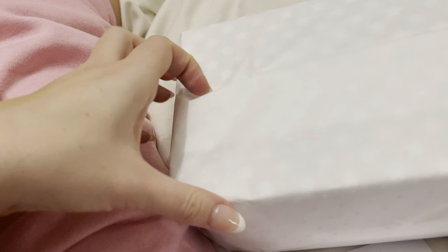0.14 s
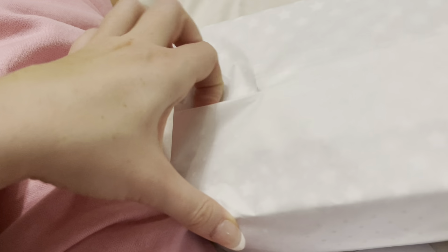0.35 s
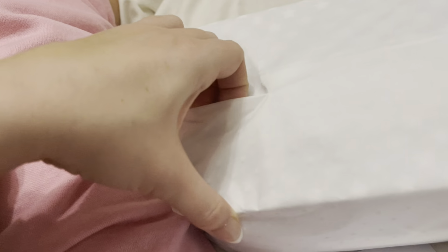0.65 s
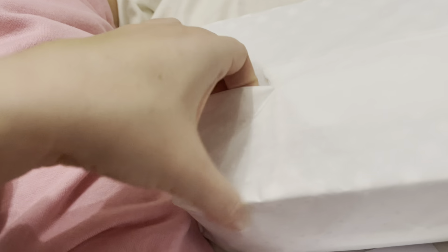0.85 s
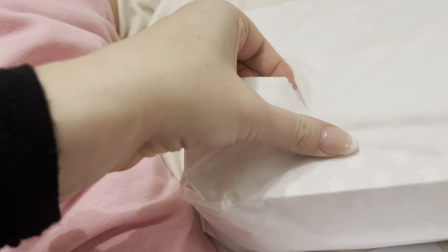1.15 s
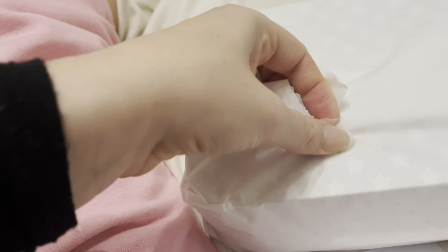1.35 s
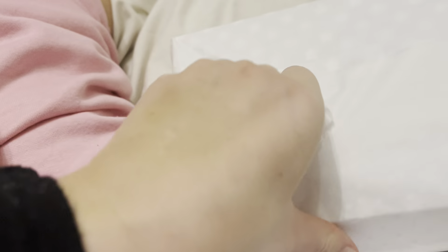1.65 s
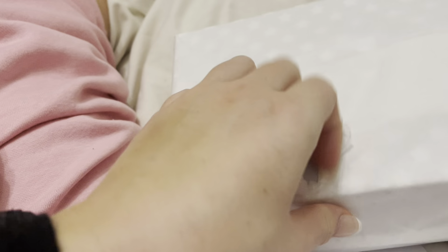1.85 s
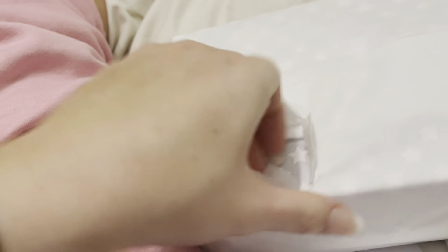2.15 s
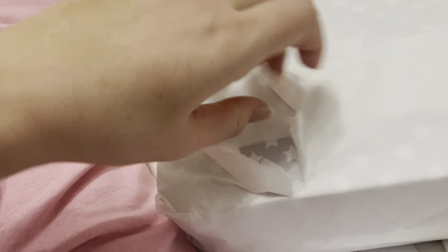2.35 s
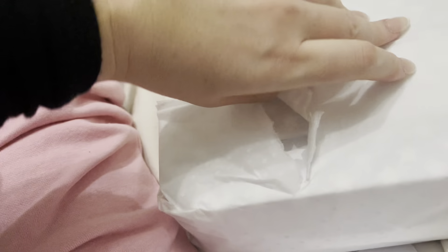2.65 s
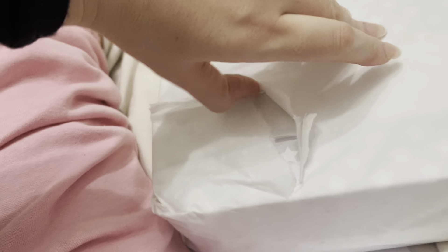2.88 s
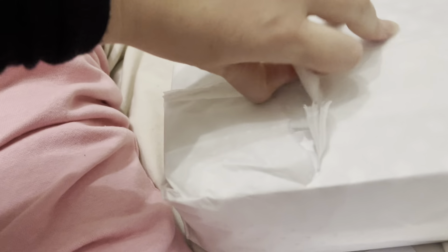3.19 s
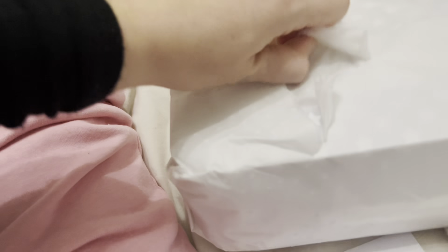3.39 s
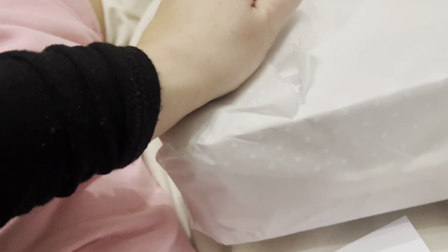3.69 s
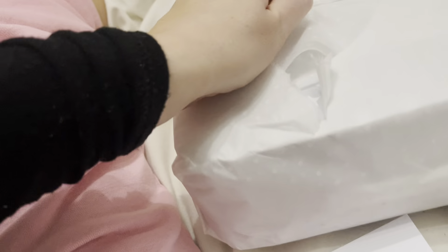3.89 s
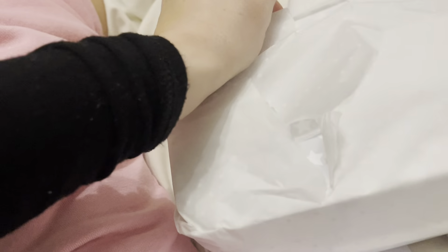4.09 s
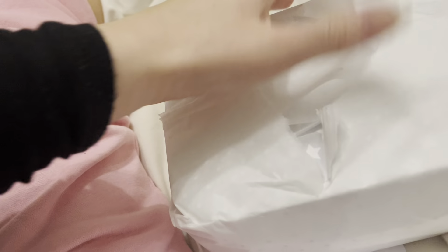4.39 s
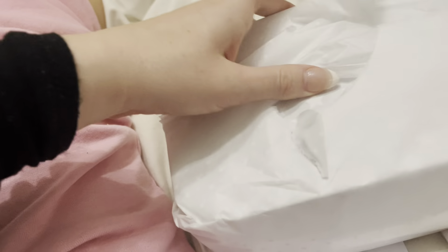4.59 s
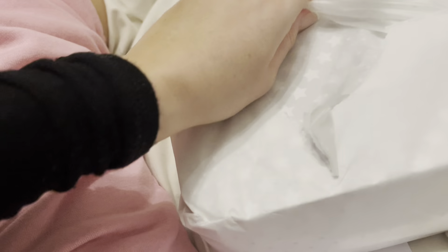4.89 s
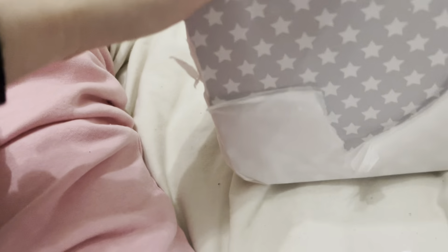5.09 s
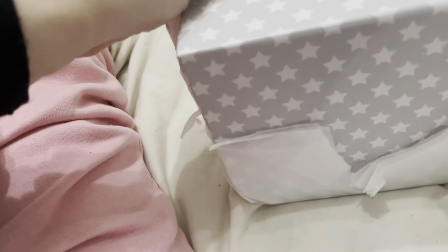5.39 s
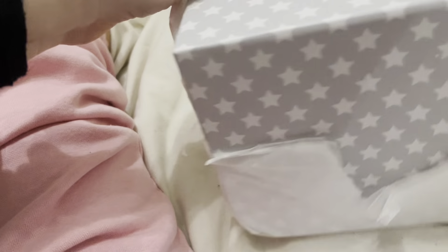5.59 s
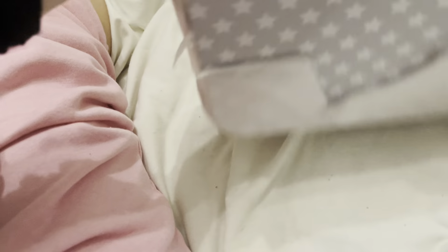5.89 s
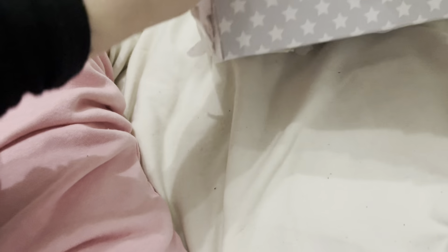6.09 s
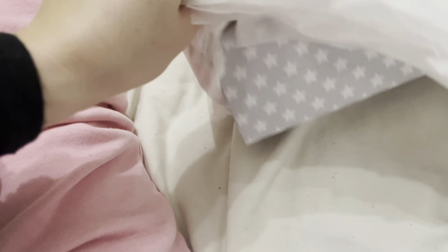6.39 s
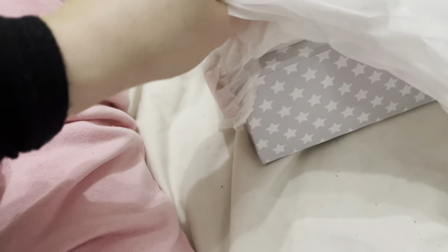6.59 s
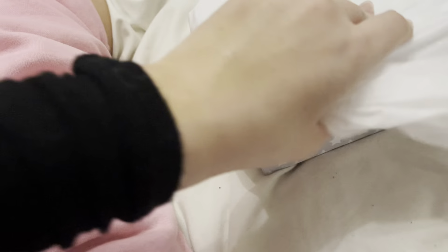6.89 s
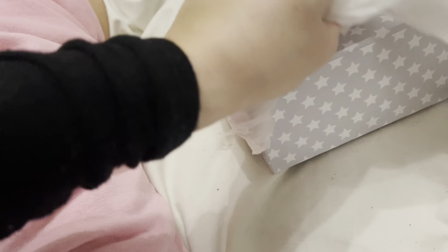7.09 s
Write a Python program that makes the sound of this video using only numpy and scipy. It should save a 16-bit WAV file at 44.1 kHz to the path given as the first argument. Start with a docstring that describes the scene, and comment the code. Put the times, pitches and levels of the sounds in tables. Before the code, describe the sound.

A hand tears tissue paper from a hollow card box resting on a bed. Light, ticking tugs come first, then a dense cluster of snapping creases and finger knocks, then smaller rustles and taps. Harder tearing returns around the middle and runs into broad crumpling and sliding to the end. Very close stereo microphone, bright and crisp, in a dry indoor space.

```python
"""A hand picks at, tears and crumples tissue paper round a hollow card box on a soft bed, from start to end.
First come light tugs; from 0.6 to 1.6 s snapping creases crowd together and fingers knock the box.
Smaller tugs and taps follow; from 3 s harder tugs return with ticks, scattered knocks and a late snap at 7 s.
Creases are dying puffs of noise in clumps, sliding is steady noise, and the box is a set of struck modes.
Two close microphone ports ring in the high treble and hear it out of step."""
import sys
import numpy as np
from scipy import signal
from scipy.fft import rfft, irfft
from scipy.io import wavfile
from scipy.ndimage import uniform_filter1d

SR = 44100
rng = np.random.default_rng(int(sys.argv[2]) if len(sys.argv) > 2 else 0)


def level_to_linear(level):
    """Convert decibel levels to linear amplitude factors, elementwise."""
    exponent = np.asarray(level, float) / 20
    return 10 ** exponent


def int16_out(signal):
    """Quantize to a 16-bit WAV file."""
    q = np.round(np.clip(np.atleast_2d(signal).T, -1, 1) * 32767)
    wavfile.write(sys.argv[1], SR, q.astype(np.int16))


N = 319725


def evened(x):
    """Scales to rms 1 of the channel mean."""
    mid = x.mean(0) if x.ndim > 1 else x
    return x / np.sqrt(np.mean(mid ** 2) + 1e-20)


def read(points, hz):
    """Reads a table on a log-frequency axis."""
    f, value = np.transpose(points)
    return np.interp(np.log(hz + 1), np.log(f + 1), value)


def curves(table):
    """Every column of a table after the time, at every sample."""
    s, *columns = np.transpose(table)
    return [np.interp(np.arange(N) / SR, s, column) for column in columns]


def add(mix, start_s, sound):
    """Mixes a sound in at its start time."""
    part = mix[..., max(round(start_s * SR), 0):][..., :sound.shape[-1]]
    part += sound[..., :part.shape[-1]]


# Likeness of the two ports. Each row: frequency in Hz, share of the left sound in the right (0 to 1).
PORT_LIKENESS = [(60, .96), (1000, .87), (3000, .55), (7000, .65), (8500, .94), (10300, .98), (13000, .85)]
# Phase between the ports. Each row: frequency in Hz, lag of the right port in radians.
PORT_LAG = [(0, 0), (1000, .25), (2500, 1.2), (3900, .3), (6800, .3), (7500, 1.3), (8700, -.3),
            (11800, -6.1), (13200, -9.1), (15000, -12.6)]
# Balance of the ports. Each row: frequency in Hz, left over right in dB.
PORT_BALANCE = [(150, 1), (500, 4), (6500, 2.5), (9800, 0)]


def ports(pair, colour_db):
    """The right port shares part of the left one's sound, shifted in phase, and hears the rest afresh."""
    hz = np.fft.rfftfreq(pair.shape[1], 1 / SR)
    left, other = rfft(pair) * level_to_linear(colour_db(hz))
    same = np.clip(read(PORT_LIKENESS, hz), 0, 1)
    lag_rad = np.interp(hz, *np.transpose(PORT_LAG))
    right = same * left * np.exp(-1j * lag_rad) + np.sqrt(1 - same ** 2) * other
    lean = level_to_linear(read(PORT_BALANCE, hz) / 2)
    return irfft([left * lean, right / lean], pair.shape[1])


# Paper through the ports, which ring near the top. Each row: frequency in Hz, level in dB.
PAPER_COLOUR = [(600, -21), (1100, -8.5), (1550, -15.5), (1900, -11), (2700, -9.5), (5000, -6.5),
                (6200, -9.5), (8000, -1.5), (9500, 2.5), (10600, 7), (11500, 1), (13000, -14.5),
                (15000, -27)]
SPLIT_HZ = 6050  # fine crumpling above, broad folds below


def paper_bands(pair):
    """Colours a pair as paper; returns its treble and its mid band."""
    def slope_db(hz):
        return 10 * np.log10(1 + (hz / SPLIT_HZ) ** 10)
    mids = ports(pair, lambda hz: read(PAPER_COLOUR, hz) - slope_db(hz))
    treble = ports(pair, lambda hz: read(PAPER_COLOUR, hz) - slope_db(SPLIT_HZ ** 2 / (hz + 1)))
    return treble, mids


TINT_DB = 4.5


def tint(size=64):
    """A short filter with a lumpy random colour of its own."""
    lumps = np.interp(np.linspace(0, 11, size // 2 + 1), np.arange(12), rng.standard_normal(12))
    return evened(np.roll(irfft(level_to_linear(TINT_DB * lumps), size), size // 2))[None]


def puffs(clicks, t60_s):
    """Each click lets out a dying puff of fresh noise; one tint colours them all."""
    shape = signal.lfilter([1], [1, -level_to_linear(-60 / (t60_s * SR))], clicks) / np.sqrt(t60_s)
    noise = shape * rng.standard_normal((2, len(clicks)))
    return signal.oaconvolve(noise, tint(), axes=1)[:, :len(clicks)]


TONE_DB, TONE_OCTAVES = 7, 1


def lift_db(hz, tone_hz):
    """A broad rise round the tone of a fold."""
    return TONE_DB * np.exp(-(np.log2((hz + 1) / tone_hz) / TONE_OCTAVES) ** 2)


def ring(modes):
    """Modes after one push; neighbours start in opposite sense, so little is left below them."""
    t = np.arange(4096) / SR
    return sum((-1) ** k * level_to_linear(db - 60 * t / t60_s) * np.sin(2 * np.pi * hz * t)
               for k, (hz, db, t60_s) in enumerate(modes))


LID_HZ, LID_T60_S = 258, .055
FLEX_HZ, FLEX_S = 1533, 0.00414  # start above the lid's pitch, time constant


def flex():
    """The card bends with a short tick that falls towards the pitch of the lid."""
    fade = np.exp(-np.arange(1024) / SR / FLEX_S)
    return fade * np.sin(2 * np.pi * np.cumsum(LID_HZ + FLEX_HZ * fade) / SR)


# Card walls and the air inside. Each row: frequency in Hz, level in dB, t60 in seconds.
BOX_MODES = [(226, 5, 0.026), (351, 6.5, 0.043), (437.5, 10.5, 0.021), (588, 8, 0.017), (1220, -1.5, 0.014)]
# Bedding gives under the box. Each row: frequency in Hz, level in dB, t60 in seconds.
BED_MODES = [(67, -8, 0.065), (115, -2.5, 0.029)]
# How the sheet is handled. Each row: time in seconds, base level of sliding against creases in dB,
# ring of the lid in dB, tone of the folds in Hz, give of the bedding in dB.
GRIP = [(0, -6, 6, 5900, -8), (.9, -7, 9.5, 4150, -8), (1.3, -3, 13.5, 2700, 10), (1.6, 0, 3.5, 2030, -19),
        (2.6, -6, 7.5, 2270, -31), (3.5, -11, 0.5, 2380, 9.5), (4.7, 2, 2.5, 2240, 7),
        (5.6, 0.5, 2.5, 1330, 14.5), (6.2, -0.5, -4, 2170, 9), (7.25, 2, 7, 1790, 12.5)]
RUB_FLEX_DB = 0


def box(pushes):
    """Walls, lid and bedding answer the pushes, lid and bedding as the grip allows; the card flexes."""
    _, lid_db, _, bed_db = curves(GRIP)
    parts = [(0, BOX_MODES), (lid_db, [(LID_HZ, 0, LID_T60_S)]), (bed_db, BED_MODES)]
    out = sum(signal.oaconvolve(pushes * level_to_linear(db), ring(modes)[None], axes=1) for db, modes in parts)
    flexing = signal.oaconvolve(pushes, flex()[None], axes=1)
    out = out[:, :N] + level_to_linear(RUB_FLEX_DB) * flexing[:, :N]
    return ports(out / np.linalg.norm(ring(BOX_MODES)), np.zeros_like)


# Fingers knock the box. Each row: start in seconds, peak of the ring ahead of the ports in dB.
KNOCKS = [(0.187, -32), (0.29, -29.5), (0.522, -32), (1.004, -22), (1.045, -26), (1.101, -21.5),
          (1.166, -23.5), (1.195, -18.5), (1.24, -25), (1.464, -29.5), (1.49, -32), (1.771, -35.5),
          (2.18, -35), (2.312, -35), (2.394, -26), (2.46, -34), (2.48, -29), (2.508, -28), (2.552, -31),
          (2.598, -34.5), (2.664, -32), (2.809, -28), (2.935, -33), (3.31, -23.5), (4.541, -23),
          (4.746, -22.5), (4.924, -28.5), (5.128, -27), (5.295, -19), (6.269, -22)]
KNOCK_SPREAD = 0.063  # pitch scatter as a fraction
KNOCK_LID_DB = 1.5  # a fingertip drives the lid more than rubbing does
KNOCK_FLEX_DB = -13.5


def knocks():
    """Fingertip pushes: the card flexes with a falling tick as the box rings, its pitch varying by knock."""
    out = np.zeros((2, N))
    at, _, lid_db, _, bed_db = np.transpose(GRIP)
    shifts = 1 + KNOCK_SPREAD * rng.standard_normal((len(KNOCKS), 1))
    for (s, db), shift in zip(KNOCKS, shifts):
        parts = [(0, BOX_MODES),
                 (np.interp(s, at, lid_db) + KNOCK_LID_DB, [(LID_HZ, 0, LID_T60_S)]),
                 (np.interp(s, at, bed_db), BED_MODES)]
        body = sum(level_to_linear(gain_db) * ring([(hz * shift, mode_db, t60_s) for hz, mode_db, t60_s in modes])
                   for gain_db, modes in parts)
        body = np.convolve(body, np.hanning(60))  # soft fingertip
        add(out, s, level_to_linear(db) * body[None] / abs(body).max())
        add(out, s, level_to_linear(db + KNOCK_FLEX_DB) * flex()[None])
    return ports(out, np.zeros_like)


# Lone creases. Each row: time of the flip in seconds, treble peak in dB.
TICKS = [(0.1434, -15.5), (0.1867, -7.5), (0.222, -27), (0.374, -13), (0.6375, -17), (0.729, -14),
         (0.7797, -15), (1.6185, -18), (1.7826, -18.5), (1.8902, -14.5), (2.254, -29), (2.512, -12),
         (3.0742, -20), (3.166, -13), (3.276, -14), (3.307, -14), (3.3663, -6), (3.777, -20.5),
         (3.8475, -21.5), (3.911, -19), (3.9737, -19), (4.001, -15), (4.1623, -22), (4.3143, -21.5),
         (4.339, -20), (4.8505, -12), (4.8955, -8), (5.2909, -6.5), (5.356, -14), (5.499, -12),
         (5.6223, -7), (5.764, -20), (5.811, -25), (5.863, -30), (6.1524, -27), (6.2683, -4), (6.5245, -21)]
TICK_T60_S, TICK_MID_DB = 0.0083, -11.5


def ticks(size=1024):
    """One crease flips with a dry tick and nothing follows."""
    out = np.zeros((2, N))
    flip = 1. * (np.arange(size) == size // 4)
    for s, db in TICKS:
        treble, mids = (b / abs(b.mean(0)).max() for b in paper_bands(puffs(flip, TICK_T60_S)))
        add(out, s - size // 4 / SR, level_to_linear(db) * (treble + level_to_linear(TICK_MID_DB) * mids))
    return out


CREASE_T60_S = 0.01
FLURRY_T60_S, FLURRY_PER_S = 0.047, 1400


def burst(size=2048):
    """A crease gives way within a millisecond, and a dying flurry of smaller ones follows it."""
    t = np.arange(size) / SR
    hits = rng.random(size) < FLURRY_PER_S / SR
    follow = rng.exponential(1.0, size) * hits * level_to_linear(-60 * t / FLURRY_T60_S)
    follow[:12] += .3
    return puffs(follow, CREASE_T60_S)


# Creases that give way and set off a crackling flurry. Each row: start in seconds, treble peak in dB,
# mid band peak in dB, tone of the fold in Hz.
SNAPS = [(0.082, -17, -19.5, 4800), (0.111, -16.5, -26, 5300), (0.255, -12.5, -29, 5000),
         (0.5923, -22, -19, 3000), (0.655, -10.5, -14.5, 4660), (0.9411, -17.5, -20.5, 2730),
         (0.9954, -11, -12, 2930), (1.046, -10.5, -9.5, 2880), (1.1015, -16, -15, 3080),
         (1.125, -7, -11, 3180), (1.1404, -14.5, -9.5, 2880), (1.192, -8.5, -15, 5930),
         (1.2367, -6.5, -21, 4780), (1.406, -20.5, -25, 4350), (1.596, -8, -8.5, 4200),
         (1.6234, -16, -6, 1910), (2.3119, -18, -25, 4730), (2.3897, -21, -32, 2820),
         (3.1283, -11, -22, 4010), (3.903, -16, -17.5, 2100), (7.068, -12, -16, 3340)]


def snaps():
    """Single creases with their flurries, each with the tone of its own fold."""
    out = np.zeros((2, N))
    for s, db, mid_db, tone_hz in SNAPS:
        treble, mids = paper_bands(burst())
        hz = np.fft.rfftfreq(mids.shape[1], 1 / SR)
        mids = irfft(rfft(mids) * level_to_linear(lift_db(hz, tone_hz)))
        treble, mids = (b / abs(b.mean(0)).max() for b in (treble, mids))
        add(out, s, level_to_linear(db) * treble + level_to_linear(mid_db) * mids)
    return out


CREASES_PER_S, SIZE_DB = 1000, 4
CLUMP_DB, CLUMP_S = 2.2, 0.008


def creases():
    """Random buckling: many small, a few large, in clumps of size; returns clicks and clump level."""
    clump = evened(uniform_filter1d(rng.standard_normal(N), max(round(CLUMP_S * SR), 2)))
    size = level_to_linear(SIZE_DB * np.minimum(rng.exponential(1, N), 2) + CLUMP_DB * clump)
    return size * (rng.random(N) < CREASES_PER_S / SR), level_to_linear(CLUMP_DB * clump)


PATCH_DB = 2.5


def toned(x):
    """Lifts the moving tone of the folds; the colour drifts in patches as the sheet changes shape."""
    hz, t, z = signal.stft(x, SR, nperseg=256)
    patches = uniform_filter1d(rng.standard_normal(z.shape[1:]), size=4, axis=0)
    patches = uniform_filter1d(patches, size=24, axis=1)
    tone_hz = np.interp(t, np.transpose(GRIP)[0], np.transpose(GRIP)[3])
    z = z * level_to_linear(lift_db(hz[:, None], tone_hz) + PATCH_DB * patches / patches.std())
    return signal.istft(z, SR, nperseg=256)[1][:, :N]


# Each tug or squeeze swells and lets go. Each row: start in seconds, height in seconds, end in seconds,
# treble level in dB, weight on the box relative to it in dB.
TUGS = [(0.084, 0.086, .135, -43, -2.5), (0.15, 0.187, .26, -31.5, -31), (0.19, 0.315, .395, -29.5, -15.5),
        (0.37, 0.521, .545, -34.5, -11), (0.592, 0.659, .69, -37, -6), (0.67, 0.729, .77, -38.5, -7),
        (0.73, 0.852, .93, -43, -26), (0.93, 1.062, 1.1, -34, -9), (1.066, 1.257, 1.37, -34.5, -10),
        (1.39, 1.419, 1.48, -37.5, -10), (1.518, 1.538, 1.58, -34.5, -10.5),
        (1.579, 1.623, 1.7, -18.5, -14), (1.725, 1.812, 1.86, -36, -12.5),
        (1.842, 1.881, 1.96, -38.5, -4.5), (1.98, 2.003, 2.06, -48.5, 6),
        (2.037, 2.149, 2.21, -28.5, -19.5), (2.233, 2.24, 2.28, -31.5, -10.5),
        (2.236, 2.321, 2.36, -33, -9.5), (2.375, 2.537, 2.57, -32, -11), (2.637, 2.659, 2.72, -30.5, -19),
        (2.724, 2.82, 2.855, -35.5, -5.5), (2.866, 2.993, 3.1, -36.5, -11.5),
        (3.08, 3.19, 3.23, -26, -15.5), (3.255, 3.326, 3.385, -18.5, -17.5), (3.36, 3.462, 3.5, -32.5, -14),
        (3.477, 3.496, 3.57, -24, -16), (3.563, 3.565, 3.73, -37.5, -12), (3.76, 3.86, 3.885, -34, -13.5),
        (3.943, 3.986, 4.115, -18.5, -19), (4.134, 4.213, 4.245, -51, 7.5), (4.179, 4.23, 4.3, -35, -21),
        (4.352, 4.416, 4.45, -38, -34), (4.448, 4.459, 4.485, -32, -13.5),
        (4.492, 4.545, 4.595, -20, -26.5), (4.63, 4.665, 4.73, -17.5, -18),
        (4.715, 4.773, 4.805, -18.5, -18), (4.758, 4.84, 4.93, -26, -16.5),
        (4.901, 4.943, 4.962, -20.5, -16.5), (4.981, 4.981, 5.07, -31.5, -13.5),
        (5.018, 5.157, 5.27, -28, -15), (5.16, 5.32, 5.42, -28.5, -18.5), (5.326, 5.453, 5.5, -33.5, -8),
        (5.5, 5.577, 5.62, -34.5, -6.5), (5.587, 5.675, 5.775, -26.5, -9.5),
        (5.917, 6.084, 6.115, -30.5, -13.5), (6.15, 6.299, 6.34, -25.5, -13.5),
        (6.302, 6.445, 6.495, -23, -14), (6.494, 6.706, 6.85, -34.5, -11.5),
        (6.718, 6.94, 7.02, -26, -13.5), (6.92, 7.102, 7.45, -27, -14)]
EDGE_DB, SWELL_BEND = 20.5, 1.83  # drop at a tug's two ends, and how rounded its top is
REST_DB, REST_BOX_DB = -51.5, -56  # sheet and box still settle between tugs


def tugs():
    """Level of the crumpling and of the pressure on the box: power of all tugs summed over the rest."""
    t = np.arange(0, N / SR + .002, .002)
    start, top, end, db, weight_db = np.transpose(TUGS)[..., None]
    away = np.where(t < top, (top - t) / (top - start), (t - top) / (end - top))
    power = level_to_linear(db - EDGE_DB * np.minimum(away, 3) ** SWELL_BEND) ** 2
    crumple = power.sum(0) + level_to_linear(REST_DB) ** 2
    press = (power * level_to_linear(weight_db) ** 2).sum(0) + level_to_linear(REST_BOX_DB) ** 2
    return [np.interp(np.arange(N) / SR, t, np.sqrt(p)) for p in (crumple, press)]


# Broad folds. Each row: time in seconds, mid band relative to the treble in dB.
FOLDS = [(0, -11.5), (.6, -0.5), (1.05, 0.5), (1.64, -7), (2.2, -9.5), (3.15, -14), (3.35, -7.5), (3.6, -1),
         (4.05, -4.5), (4.5, -7), (5.1, -2), (6.4, -2.5), (7.25, -3)]
REST_FOLDS_DB = -54.5
DENSE_DB_PER_DB = 0.36  # harder tugs blur the creases into sliding


def rustle(count=10):
    """The stream of creases and sliding sheets, shaped by the hand, and the box drumming under it."""
    clicks, clumps = creases()
    kind = rng.integers(0, count, N)
    lengths = np.geomspace(.15, 1.8, count)
    crackle = sum(puffs(clicks * (kind == k), CREASE_T60_S * f) for k, f in enumerate(lengths))
    crumple, press = tugs()
    slide = level_to_linear(curves(GRIP)[0]) * (crumple / crumple.std()) ** DENSE_DB_PER_DB
    sliding = rng.standard_normal((2, N))
    pair = (evened(crackle) + slide * sliding) / np.sqrt(1 + slide ** 2)
    treble, mids = paper_bands(pair)
    folds = np.hypot(crumple * level_to_linear(curves(FOLDS)[0]), level_to_linear(REST_FOLDS_DB))
    paper = crumple * evened(treble) + folds * evened(toned(mids))
    pushes = evened(clicks) * rng.standard_normal((2, N)) + slide * sliding
    pushes = pushes / np.sqrt((1 + slide ** 2) * clumps)
    return paper + box(pushes * press / pushes.std())


def scene():
    """Paper and box, close by on soft bedding."""
    return knocks() + ticks() + snaps() + rustle()


def low_pass(x):
    """Removes everything above the highest recorded frequency."""
    return signal.sosfilt(signal.butter(12, 16650, fs=SR, output="sos"), x)


LOW_CUT_HZ, CEILING, TOP_HZ = 52, 0.6, 15900


def record(dry):
    """The microphone's bass cut and band limit, with a soft ceiling that rounds the loudest peaks."""
    cut = signal.sosfilt(signal.butter(2, LOW_CUT_HZ, "high", fs=SR, output="sos"), dry)
    held = CEILING * np.tanh(cut / CEILING)
    top = signal.firwin(255, TOP_HZ, fs=SR)[None]
    finished = signal.oaconvolve(held, top, "same", axes=1)
    return low_pass(finished)


dry = scene()
out = record(dry)
int16_out(out)
```